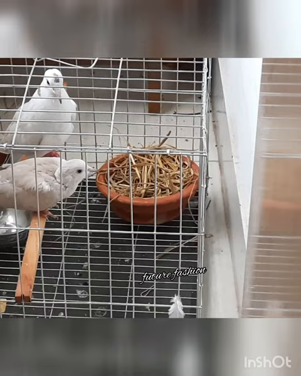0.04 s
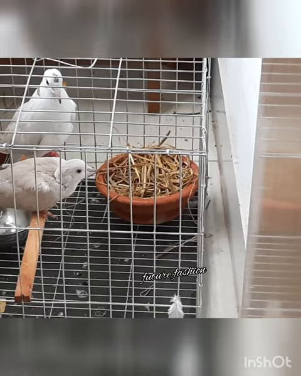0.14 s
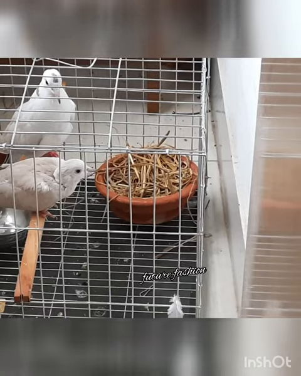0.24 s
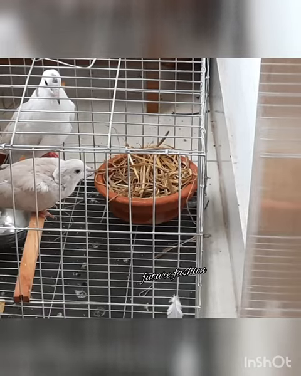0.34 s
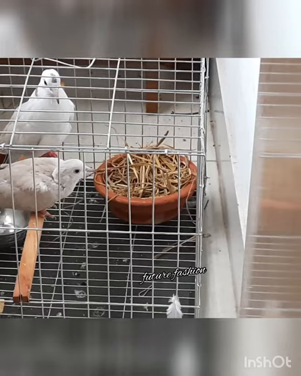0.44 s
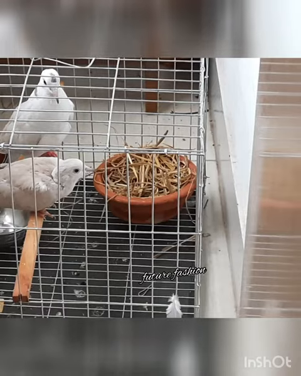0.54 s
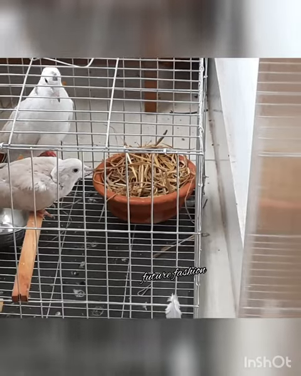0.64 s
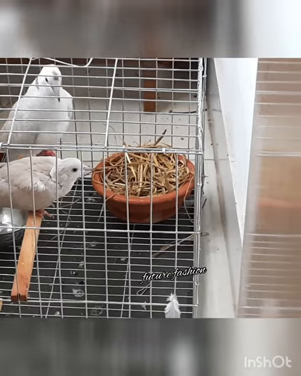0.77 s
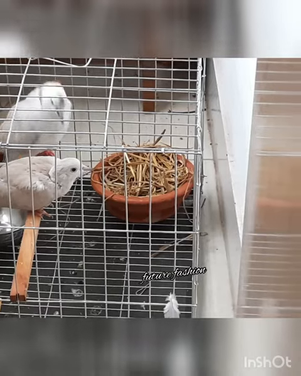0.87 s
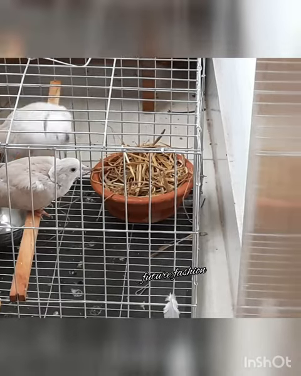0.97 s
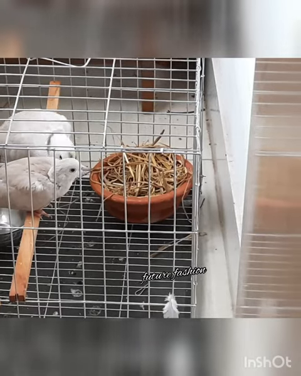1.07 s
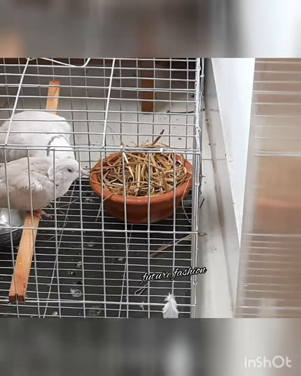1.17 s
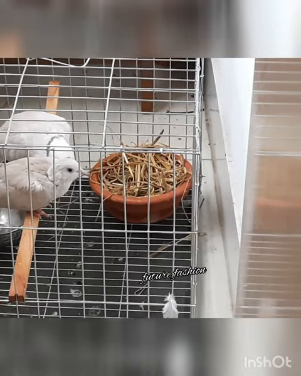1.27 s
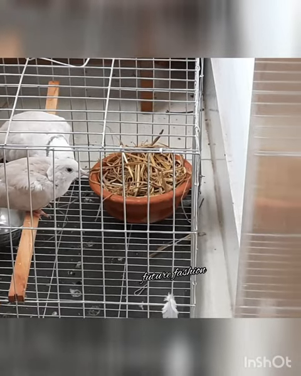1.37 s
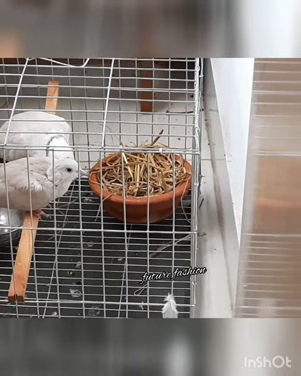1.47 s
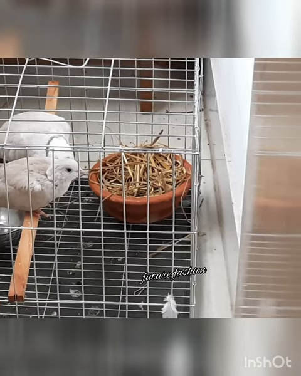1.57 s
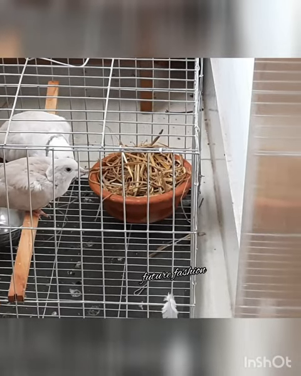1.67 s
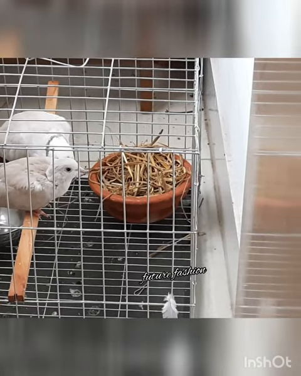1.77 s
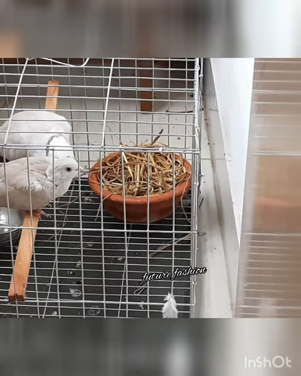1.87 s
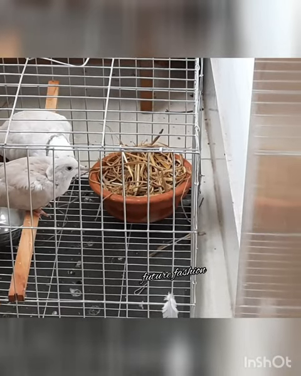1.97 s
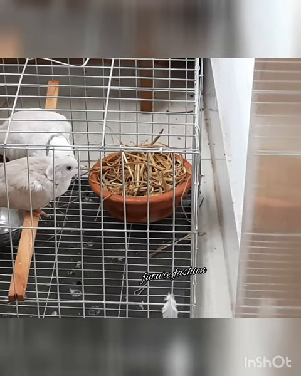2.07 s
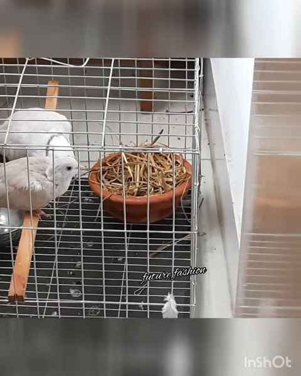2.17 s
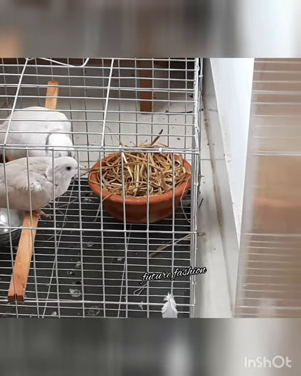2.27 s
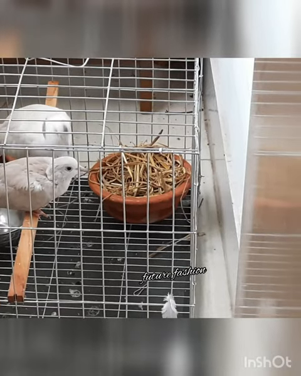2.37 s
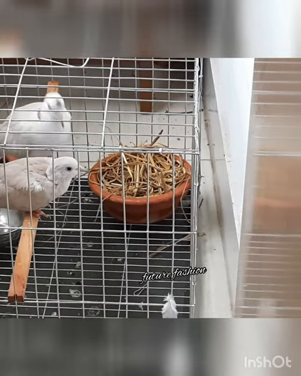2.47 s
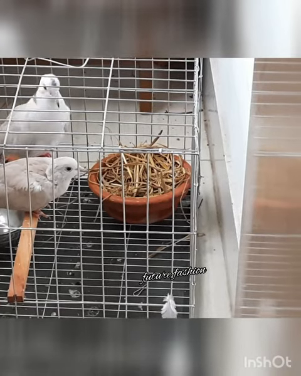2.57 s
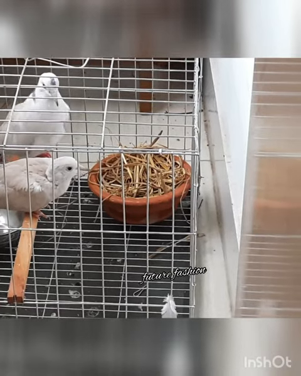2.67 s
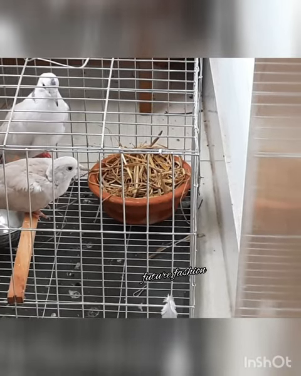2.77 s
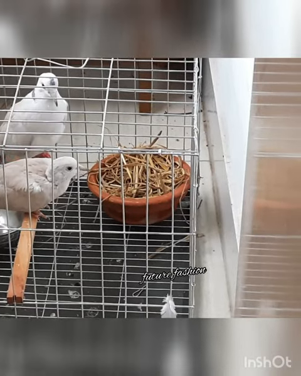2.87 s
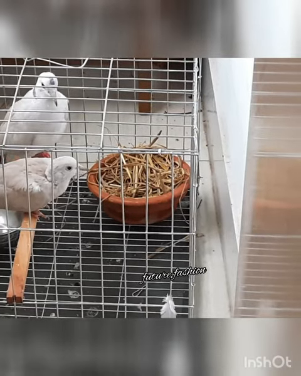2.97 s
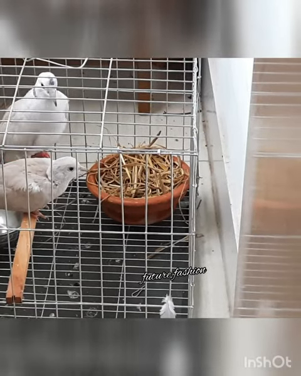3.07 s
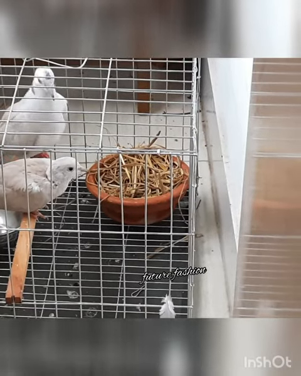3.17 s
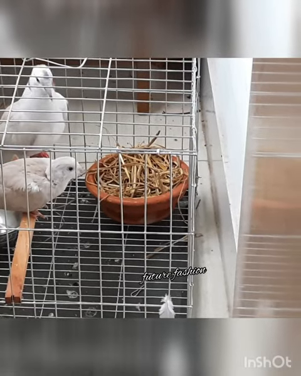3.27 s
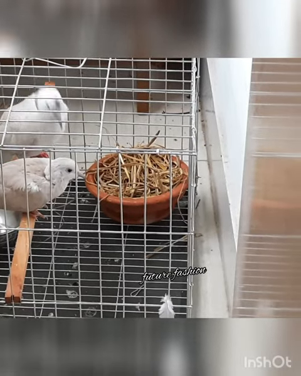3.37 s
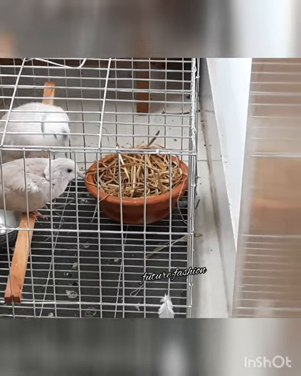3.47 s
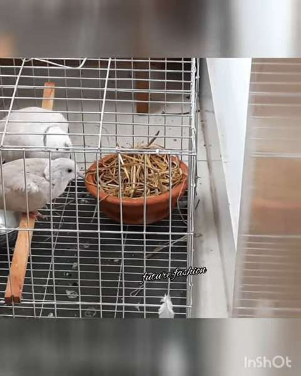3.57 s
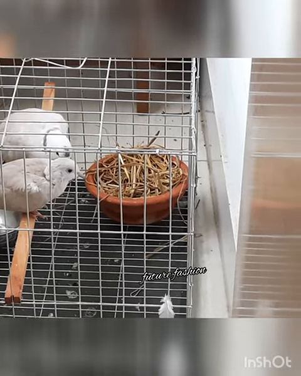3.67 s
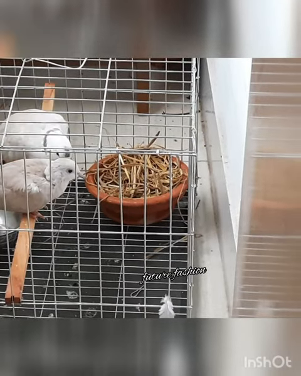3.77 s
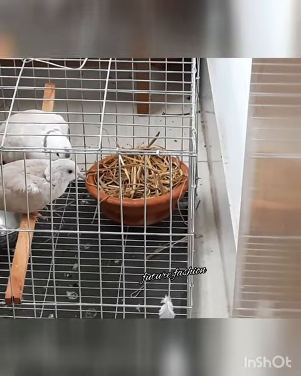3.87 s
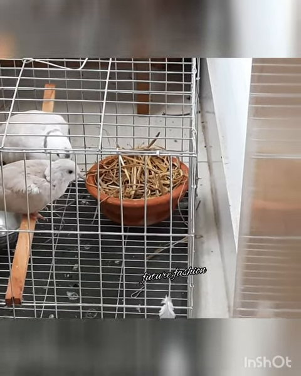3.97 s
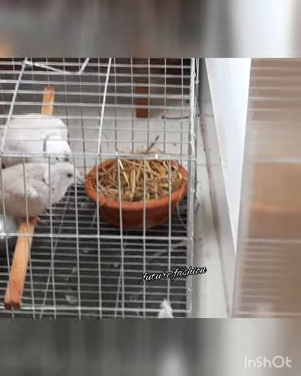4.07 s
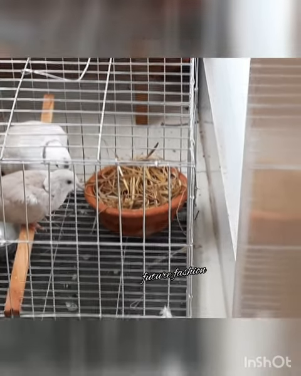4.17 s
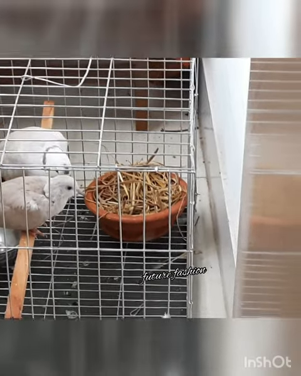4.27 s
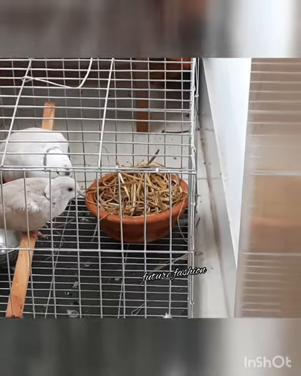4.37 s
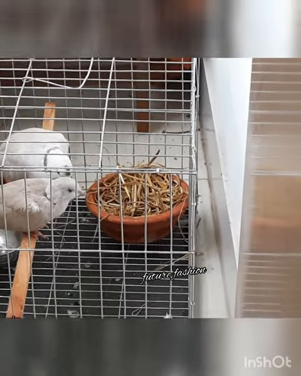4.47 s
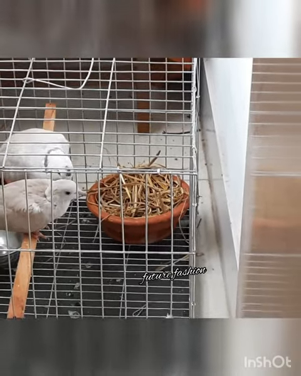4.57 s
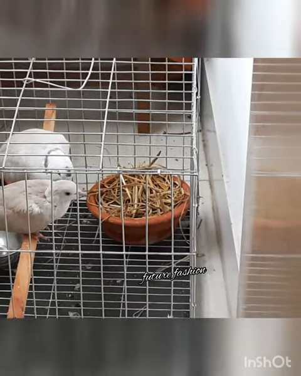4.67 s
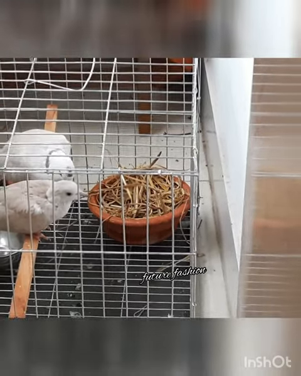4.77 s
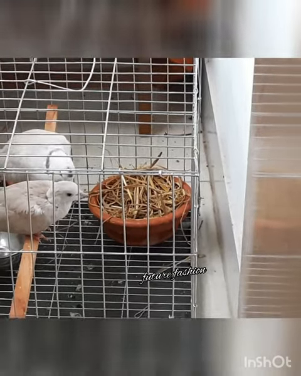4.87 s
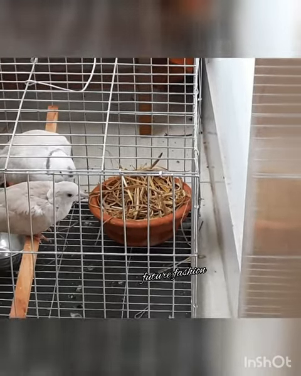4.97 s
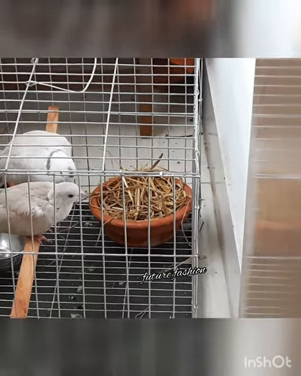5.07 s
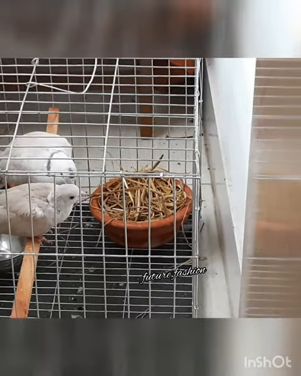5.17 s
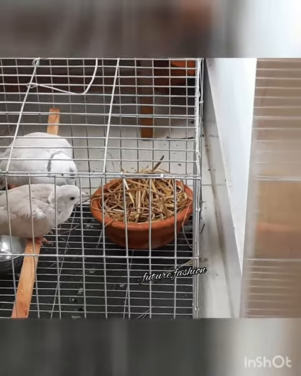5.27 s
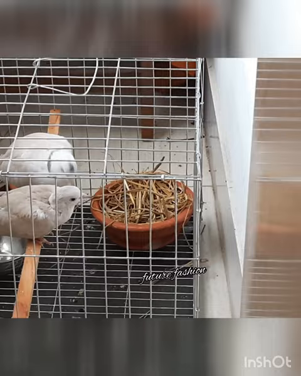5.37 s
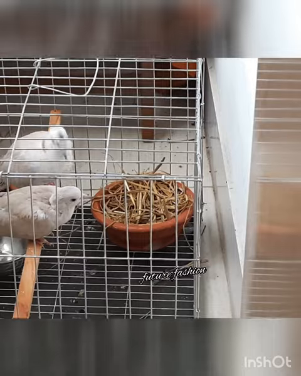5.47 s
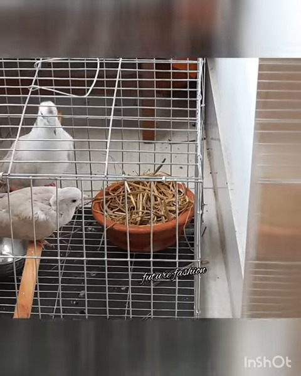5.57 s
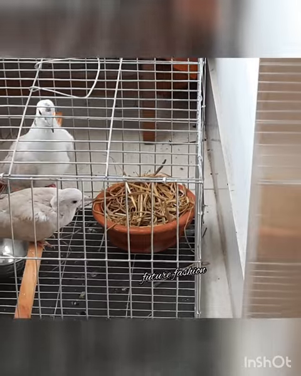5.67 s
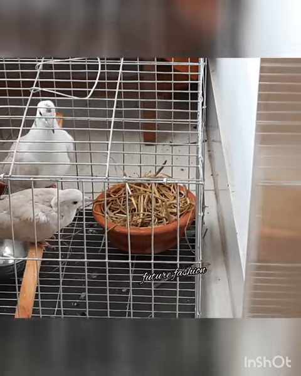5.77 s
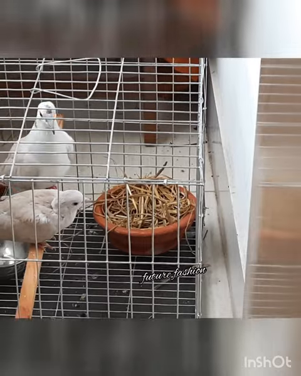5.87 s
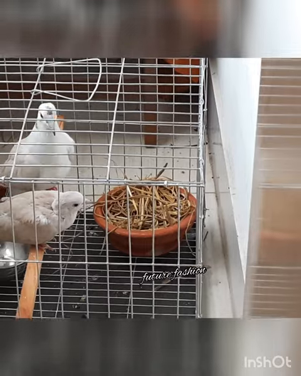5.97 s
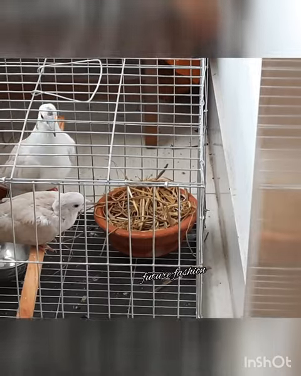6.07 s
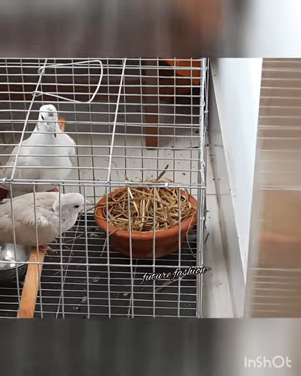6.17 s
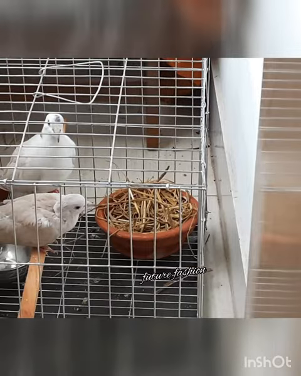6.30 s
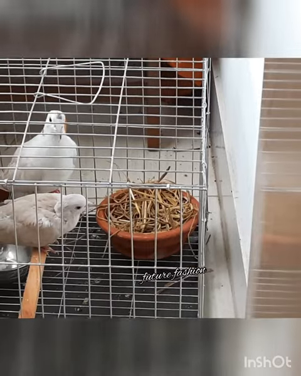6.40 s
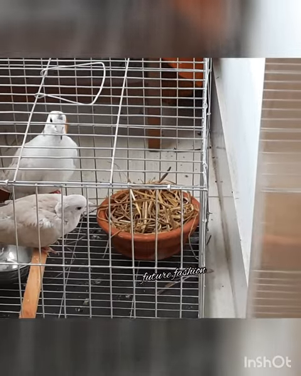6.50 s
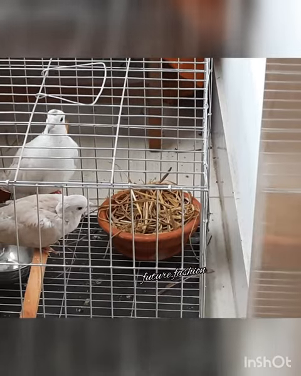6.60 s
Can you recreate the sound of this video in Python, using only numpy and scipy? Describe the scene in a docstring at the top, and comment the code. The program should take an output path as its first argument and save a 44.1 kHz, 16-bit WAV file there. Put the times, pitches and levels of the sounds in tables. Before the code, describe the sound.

A dove coos close to a phone on a hard-walled balcony. The tail of one coo falls away first, then two complete coos follow, each a brief hoot, a quick rolling purr and a long descending note. The walls make the pure, low tone boom and ring. Behind it are quiet traffic wash, soft rustles, thin distant whistles, sparrow chirps and a faint high squeak.

```python
"""A dove coos in a wire cage on a walled balcony, close to a phone: a short hoot, a rolled purr, a long falling note.
It opens on a long note, then come two whole coos, each an almost pure gliding tone with faint overtones.
The hard walls boom at a few pitches, near walls echo and a far wall returns a faint echo.
Behind it lie shaped-noise street wash and rustles, and blurred tones: horns, whistles, sparrows, a repeating squeak."""
import sys
import numpy as np
from scipy import signal
from scipy.fft import rfft, irfft
from scipy.io import wavfile
from scipy.ndimage import uniform_filter1d

SR = 44100
rng = np.random.default_rng(int(sys.argv[2]) if len(sys.argv) > 2 else 0)


def dump_mix(stems):
    """Bounce the given channels to the path in sys.argv[1] as a 16-bit WAV at rate SR."""
    frames = np.atleast_2d(stems).T  # one column per channel
    limited = np.clip(frames, -1, 1)  # hard clip at full scale
    pcm = np.round(limited * 32767).astype(np.int16)
    wavfile.write(sys.argv[1], SR, pcm)


N = 292804  # length of the scene [samples]


def gain_of(db):
    """Decibels to an amplitude factor."""
    return 10 ** (np.asarray(db) / 20)


def evened(x):
    """Scales to rms 1."""
    return x / np.sqrt(np.mean(x ** 2) + 1e-20)


def read(points, hz):
    """Reads a table along log frequency."""
    f, value = np.transpose(points)
    return np.interp(np.log(hz + 1), np.log(f + 1), value)


def add(mix, s, sound):
    """Mixes a sound in at s seconds, cut off at the end of the mix."""
    part = mix[..., round(s * SR):][..., :sound.shape[-1]]
    part += sound[..., :part.shape[-1]]


def swelled(length, rise_s, fall_s):
    """An envelope with rounded ends; length in samples."""
    t = np.arange(length) / SR
    ramp = np.minimum(t / rise_s, t[::-1] / fall_s)
    return np.sin(np.pi / 2 * np.clip(ramp, 0, 1)) ** 2


def fuzz(length, width_hz):
    """Complex noise of rms 1 around zero frequency: two equal poles set its bandwidth."""
    r = np.exp(-np.pi * width_hz / SR)
    z = rng.standard_normal((2, length + SR // 10))  # the extra tenth of a second lets the filter settle
    z = signal.lfilter([1], [1, -2 * r, r * r], z[0] + 1j * z[1])[-length:]
    return z / np.sqrt(np.mean(abs(z) ** 2))


# stereo likeness of the noises: (frequency [Hz], left-right correlation [-1 to 1])
PORT_LIKENESS = [(60, 0.63), (130, 0.89), (290, 0.79), (640, -0.11), (1410, -0.00096), (3100, 0.14),
                 (6820, -0.31), (15000, -0.14)]
# stereo balance of the noises: (frequency [Hz], left minus right [dB])
PORT_BALANCE = [(60, 1.5), (130, 3), (290, -0.5), (640, 1), (1410, -6), (3100, -5.5), (6820, -3),
                (15000, -5.5)]


def coloured(db_per_hz, length):
    """Stereo noise coloured by a spectrum curve; the two ports share most of the bass and little of the treble."""
    hz = np.fft.rfftfreq(1024, 1 / SR)
    a, b, c, d = rng.standard_normal((length // 256 + 5, 513, 4)).T
    left, other = a + 1j * b, c + 1j * d
    same = np.clip(read(PORT_LIKENESS, hz), -1, 1)[:, None]
    z = np.array([left, same * left + np.sqrt(1 - same ** 2) * other])
    half = read(PORT_BALANCE, hz)[:, None] / 2
    z *= gain_of(db_per_hz(hz[:, None]) + np.array([half, -half]))
    return signal.istft(z, nperseg=1024, noverlap=768)[1][:, :length]


def in_band(x, lo, hi):
    """Scales so that one band of the channel mean has rms 1."""
    band = signal.butter(4, [lo, hi], "bandpass", fs=SR, output="sos")
    return x / signal.sosfilt(band, x.mean(0)).std()


def far(first_hz, last_hz, length_s, blur_hz, steady, fade=0.62):
    """A far tone: a steady share plus a smear from many paths, differing per port; lasts 1.3 times length_s."""
    hz = np.linspace(first_hz, last_hz, round(1.3 * length_s * SR))
    u = np.linspace(0, 1, len(hz))
    paths = np.array([steady * np.exp(2j * np.pi * rng.random()) + fuzz(len(u), blur_hz) for _ in range(2)])
    tone = evened((paths * np.exp(2j * np.pi * np.cumsum(hz) / SR)).real)
    shape = swelled(len(u), 0.0073, .03) * np.exp(-fade * u ** 2)
    return tone * shape * gain_of([[-2.4], [1.6]])  # leans to the right


# overtones of the coo: (multiple of the pitch [-], level against the fundamental [dB])
COO_OVERTONES = [(2, -46.5), (3, -47)]


def voice(hz):
    """The closed beak and swollen throat pass an almost pure tone."""
    turn = 2 * np.pi * np.cumsum(hz) / SR
    overtones = sum(gain_of(db) * np.sin(k * turn) for k, db in COO_OVERTONES)
    return np.sqrt(2) * (np.sin(turn) + overtones)


def sing(gestures):
    """Plays gliding gestures, dry; each starts abruptly as the syrinx opens."""
    out = np.zeros(N)
    for rows in gestures:
        s, hz, db = np.transpose(rows)
        t = np.arange(s[0], s[-1], 1 / SR)
        effort = swelled(len(t), rise_s=0.0066, fall_s=0.0079) * gain_of(np.interp(t, s, db))
        add(out, s[0], effort * voice(np.interp(t, s, hz)))
    return out


# pitch and effort lines of the long notes, one list per note, dry: (time [s], pitch [Hz], effort [dB rms])
LONG_NOTES = [
    [(0.0, 607, -29), (.055, 612, -15.5), (.11, 599.8, -21), (.163, 594, -30.5), (.176, 527.7, -27),
     (.21, 527.5, -24), (.34, 514, -33.5), (.54, 493.3, -37), (.58, 469.4, -43.5), (.65, 475, -39),
     (.675, 460, -63)],
    [(2.088, 439, -29), (2.12, 616.3, -24), (2.27, 610.4, -22), (2.43, 602, -23.5), (2.5, 583.3, -26.5),
     (2.555, 586.7, -27), (2.604, 507.4, -32), (2.72, 487.7, -35.5), (2.8, 454.6, -45.5), (2.815, 460, -64)],
    [(4.576, 446.7, -26.5), (4.61, 631, -27.5), (4.67, 616, -43), (4.76, 605, -44), (4.86, 620, -30),
     (5.0, 610.8, -21.5), (5.13, 588.9, -29.5), (5.19, 584.5, -25), (5.25, 573.6, -35),
     (5.31, 510.5, -27.5), (5.38, 435, -57)],
]


def long_notes():
    """The long note that closes each coo, its pitch falling as the breath fades."""
    return sing(LONG_NOTES)


# wash of the street: (time [s], traffic at 900-1900 Hz [dB rms], hiss at 10.5-15 kHz [dB rms], engine rumble [dB rms])
STREET_LEVELS = [(0.0, -53, -76, -57), (0.07, -59, -80.5, -66.5), (0.37, -59, -83.5, -56),
                 (0.83, -61, -85, -61.5), (1.03, -58.5, -81, -54.5), (1.26, -63, -88, -68),
                 (1.4, -61.5, -84, -56), (1.96, -55.5, -80, -56), (3.0, -62, -84.5, -60.5),
                 (3.92, -60, -83.5, -62), (4.08, -55.5, -80, -52), (4.34, -57.5, -80.5, -62.5),
                 (4.36, -57.5, -81, -54), (4.86, -57.5, -80, -58.5), (5.47, -61.5, -86.5, -61.5),
                 (6.01, -63, -86, -63), (6.21, -62.5, -82, -49), (6.32, -62.5, -83.5, -71),
                 (6.51, -61, -80.5, -51.5), (6.64, -59, -80, -64)]
# colour of the traffic: (frequency [Hz], relative level [dB per Hz])
TRAFFIC_COLOUR = [(53, -45), (90, -13), (109, -1), (166, -13.5), (245, -4), (354, -5), (394, -11),
                  (590, -5.5), (899, -12.5), (4530, -33.5), (6000, -45.5), (7800, -77), (13200, -120)]
# colour of the fine hiss: (frequency [Hz], relative level [dB per Hz])
HISS_COLOUR = [(3000, -31.5), (4200, -17), (6000, -7.5), (7800, -7), (8600, -12), (9500, -28.5),
               (10800, -16), (12800, -13.5), (15500, -19.5)]
# colour of the engine rumble: (frequency [Hz], relative level [dB per Hz])
RUMBLE_COLOUR = [(21, -49), (35, -13.5), (59, 4.5), (75, -3), (92, -5.5), (100, -2.5), (130, -29.5),
                 (220, -120)]
# wavering drones in the wash: (frequency [Hz], width [Hz], level at mean traffic [dB rms])
STREET_DRONES = [(71, 24, -72), (117, 4.9, -60.5), (193, 12, -59), (236.6, 3.9, -61), (287.4, 27, -60),
                 (419.4, 30, -60), (844, 14, -61.5)]


def street(patchy_db=1.54):
    """Traffic wash in drifting patches, fine hiss above, rumble below, and wavering drones that follow the traffic."""
    s, *levels_db = np.transpose(STREET_LEVELS)
    t = np.arange(N) / SR
    traffic, hiss, rumble = (gain_of(np.interp(t, s, db)) for db in levels_db)
    # random level patches, smoothed over frequency and time
    patches = rng.standard_normal((N // 256 + 5, 513)).T
    patches = uniform_filter1d(uniform_filter1d(patches, 14, 0), 16, 1)
    patches = patchy_db * evened(patches)
    out = traffic * in_band(coloured(lambda hz: read(TRAFFIC_COLOUR, hz) + patches, N), 900, 1900)
    out += hiss * in_band(coloured(lambda hz: read(HISS_COLOUR, hz) + patches, N), 10500, 15000)
    # the rumble is mostly common to both ports
    grumble = rfft(rng.standard_normal((3, N))) * gain_of(read(RUMBLE_COLOUR, np.fft.rfftfreq(N, 1 / SR)))
    mid, *ports = irfft(grumble, N)
    out += rumble * evened(mid + .22 * np.array(ports)) * gain_of([[.8], [-.8]])
    follow = (traffic / traffic.mean()) ** 1.6
    for hz, width_hz, db in STREET_DRONES:
        drone = np.sqrt(2) * (fuzz(N, width_hz) * np.exp(2j * np.pi * hz * t)).real
        out += gain_of(db) * drone * follow
    return out


# booms of the walls, levels at resonance against the direct sound:
# (frequency [Hz], decay to -60 dB [s], polarity and strength [factor], left [dB], right [dB])
WALL_BOOMS = [(593.6, 0.32, 0.94, 16, 8.5), (482, 0.45, 0.88, 2, 8.5), (471, 0.54, -0.7, -5, -12),
              (547.6, 0.14, 0.77, 7, -8.5), (659.7, 0.16, -1, -12.5, 4)]
# echoes of the near walls: (delay [s], left [dB], right [dB])
NEAR_ECHOES = [(.004, -10.5, -3), (.009, -12, -17), (.016, -15, -7.5), (.024, -9, -8.5), (.035, -13, -11),
               (.051, -14.5, -22.5)]
# echo of the far wall, sides swapped: (delay [s], level [dB])
FAR_ECHO = (.42, -40.)


def balcony(x):
    """Direct sound, near echoes, the booms of the walls, a thin diffuse tail and one far echo."""
    t = np.arange(SR) / SR
    dying = gain_of(-60 * t / .4)  # the tail dies by 60 dB in .4 s
    response = gain_of(-19) * rng.standard_normal((2, SR)) * dying / np.linalg.norm(dying)
    for hz, t60, sign, *db in WALL_BOOMS:
        ring = gain_of(-60 * t / t60)
        response += sign * gain_of(db)[:, None] * 2 * ring / ring.sum() * np.sin(2 * np.pi * hz * t)
    response[:, 0] += 1  # direct sound
    for delay, *db in NEAR_ECHOES:
        response[:, round(delay * SR)] += gain_of(db)
    near = signal.fftconvolve(x[None], response, axes=1)[:, :N]
    out = near.copy()
    delay, db = FAR_ECHO
    add(out, delay, gain_of(db) * near[::-1])
    return out


# short rustles, levels before the fades: (time [s], length [s], level [dB rms], brightness tilt [dB per octave])
RUSTLE_EVENTS = [(0.041, 0.05, -57.5, -5), (0.204, 0.14, -73, 0), (0.584, 0.075, -53, -5),
                 (0.956, 0.14, -68, -4), (1.684, 0.2, -56.5, -6), (2.524, 0.064, -50.5, -7.5),
                 (2.712, 0.11, -70, -4), (3.202, 0.029, -60, -5), (6.375, 0.025, -65, -2),
                 (3.412, 0.19, -59.5, -6), (4.469, 0.22, -60, -8.5), (5.452, 0.11, -61, -6.5),
                 (5.705, 0.067, -52.5, -7.5), (6.372, 0.25, -59, -8.5)]
# shared colour of the rustles: (frequency [Hz], relative level [dB per Hz])
RUSTLE_COLOUR = [(1500, -28.5), (2500, -8), (4000, -6), (7500, -6.5), (8800, -16), (10000, -30),
                 (12500, -9.5), (15500, -23.5)]


def rustles():
    """Bursts of coloured noise, roughened by a random crackle and tapered at both ends."""
    out = np.zeros((2, N))
    for s, length, db, tilt_db in RUSTLE_EVENTS:
        n = round(length * SR)

        def colour(hz):
            return read(RUSTLE_COLOUR, hz) + tilt_db * np.log2(hz / 4000 + 0.009)

        noise = coloured(colour, n + 1024)[:, -n:]
        crackle = gain_of(3 * evened(uniform_filter1d(rng.standard_normal(n), 90)))  # grains of about 2 ms
        add(out, s, gain_of(db) * evened(noise * crackle) * signal.windows.tukey(n, .7))
    return out


def blurred_calls(rows):
    """Places far calls, given as rows of start, length, first and last pitch, level and blur."""
    out = np.zeros((2, N))
    for s, length, first_hz, last_hz, db, blur_hz in rows:
        add(out, s, gain_of(db) * far(first_hz, last_hz, length, blur_hz, steady=min(1.2, 30 / blur_hz)))
    return out


# thin far whistles, each sounding 1.3 times its length, levels before fades and stereo lean:
# (time [s], length [s], pitch [Hz], level [dB rms])
WHISTLE_EVENTS = [ (0.106, 0.12, 3810, -65), (.26, 0.084, 2860, -64), (0.924, .1, 4170, -72),
                  (0.953, 0.12, 3580, -73), (1.625, .07, 2200, -61.5), (1.7, 0.084, 4140, -62.5),
                  (1.711, 0.082, 3265, -64), (1.796, 0.072, 4150, -58), (1.807, 0.078, 3410, -58.5),
                  (1.877, .05, 2790, -62), (2.18, .07, 2803, -61.5), (2.458, 0.12, 3720, -60),
                  (2.58, 0.058, 3260, -65.5), (3.3, 0.13, 3600, -64.5), (3.438, 0.054, 3407, -53),
                  (3.462, 0.16, 3744, -64), (3.523, 0.054, 3394, -51.5), (3.581, .4, 3420, -66),
                  (3.676, 0.12, 3400, -59), (4.101, .08, 3400, -68.5), (4.105, 0.1, 2139, -62.5),
                  (4.21, .09, 3725, -62), (4.33, .09, 2790, -61), (4.505, 0.078, 2167, -60.5),
                  (5.416, 0.13, 3780, -65), (5.553, 0.12, 2720, -67), (5.975, .3, 3260, -64.5),
                  (5.981, 0.072, 3845, -70), (6.362, 0.29, 3330, -59), (6.436, 0.11, 3430, -69),
                  (6.485, 0.19, 3760, -66), (6.522, 0.12, 3440, -61.5)]


def whistles(blur_hz=44.6):
    """Far whistles, each holding one pitch, slightly blurred by the many paths."""
    return blurred_calls([(s, length, hz, hz, db, blur_hz) for s, length, hz, db in WHISTLE_EVENTS])


def twitters(count=16, low_hz=2820, high_hz=4540):
    """Fainter chirps at chance moments, gliding slightly up or down; the longer, the louder."""
    rows = []
    for when, pitch, slide, size in rng.random((count, 4)):
        hz = low_hz * (high_hz / low_hz) ** pitch
        last_hz = hz * (1 + 0.086 * (slide - .5))
        rows.append((when * N / SR, .07 * (.5 + size), hz, last_hz, -80 + 6 * size, 90))
    return blurred_calls(rows)


# a squeak on a beat of about three quarters of a second, some beats silent, levels before fades and stereo lean:
# (time [s], level [dB rms])
SQUEAK_EVENTS = [(1.0, -71), (1.73, -66.5), (3.96, -71.5), (4.669, -63.5), (5.43, -69.5), (6.19, -70.5)]


def squeaks(hz=6300, length_s=.24, octave_db=-10.):
    """A high blurred tone with a weaker, more smeared octave that fades sooner."""
    out = np.zeros((2, N))
    for s, db in SQUEAK_EVENTS:
        add(out, s, gain_of(db) * far(hz, hz, length_s, 45, steady=0.55, fade=2.0))
        add(out, s, gain_of(db + octave_db) * far(2 * hz, 2 * hz, length_s, 300, steady=.2, fade=2.5))
    return out


# short hoots that open each whole coo, dry: (time [s], length [s], top pitch [Hz], effort [dB rms])
HOOT_EVENTS = [(1.05, .15, 653.7, -33), (3.488, .183, 662, -34)]
# shape of a hoot, a low pop, a leap, a catch, a drop:
# (share of length [0-1], share of top pitch [0-1], level against the effort [dB])
HOOT_SHAPE = [(0, .72, 14.5), (.07, .79, -3), (.17, 1, 1.5), (0.301, 1, -3), (.6, .96, 3),
              (.76, .95, -12.5), (.88, .93, -3), (1, 0.9, -24)]


def hoots():
    """One gesture stretched to each hoot: a low pop leaps to the top pitch, catches and drops."""
    shape = np.array(HOOT_SHAPE)
    return sing([shape * [length, top_hz, 1] + [s, 0, db] for s, length, top_hz, db in HOOT_EVENTS])


# quick trills that begin each purr:
# (time [s], first gap [s], widening per pulse [s], final effort [dB rms], extra level of the timid start [dB])
TRILL_EVENTS = [(1.352, .0356, 0.000036, -33, -13.5), (3.832, .0341, 0.00035, -31, -5)]


def trill_pulses(count=10, pulse_s=0.031, swell_db=1.8, settle_pulses=1.1):
    """Pulse rows of the even trills: a timid, flat start, then growing effort and a climbing foot."""
    top_hz, flat_hz, foot_hz, climb_hz = 608, 85, 414.6, 4  # flat_hz: first pulse's drop; climb_hz: per pulse
    wobble_hz, wobble_db = 1.2 * 0 + 10, 1.2  # chance unevenness from pulse to pulse
    k, rows = np.arange(count), []
    timid = np.exp(-k / settle_pulses)
    for s, gap, widening, db, timid_db in TRILL_EVENTS:
        foot, push = rng.standard_normal((count, 2)).T * [[wobble_hz], [wobble_db]]
        starts = s + gap * k + widening * k ** 2 / 2
        first_hz = top_hz - flat_hz * timid
        last_hz = foot_hz + climb_hz * k + foot
        effort_db = db + push - swell_db * k[::-1] + timid_db * timid
        rows += zip(starts, pulse_s + 0 * k, first_hz, last_hz, effort_db)
    return rows


# slower rolls that end each purr, each sliding down, dry:
# (time [s], length [s], first pitch [Hz], last pitch [Hz], effort [dB rms])
ROLL_PULSES = [(1.719, 0.032, 596, 480, -29.5), (1.755, 0.052, 600, 512.4, -31.5),
               (1.799, 0.039, 603.5, 523, -30), (1.841, 0.055, 622, 513.7, -32),
               (1.9, .05, 623, 508.5, -27), (1.953, 0.069, 629.4, 460, -30), (2.034, 0.055, 618, 461, -28),
               (4.187, 0.033, 603, 466, -30), (4.224, 0.038, 607, 561, -30), (4.259, 0.057, 618, 557, -33),
               (4.313, .062, 617.4, 560, -32.5), (4.368, 0.062, 615.4, 522, -29),
               (4.442, .069, 639.3, 466, -30), (4.519, 0.045, 668.5, 474.5, -30)]


def purr(even_s=.05):
    """Trill, then rolls: one syrinx plays all pulses, so the tone runs on unbroken where pulses join."""
    hz, effort = np.full(N, 608.0), np.zeros(N)
    for s, length, first_hz, last_hz, db in trill_pulses() + ROLL_PULSES:
        u = np.linspace(0, 1, round(length * SR))
        slide = u ** (length / even_s)  # short pulses drop at once, long ones hold the pitch first
        hz[round(s * SR):][:len(u)] = first_hz + (last_hz - first_hz) * slide
        add(effort, s, swelled(len(u), rise_s=.007, fall_s=.008) * gain_of(db))
    return effort * voice(uniform_filter1d(hz, size=130))


# sparrow chirps, each sounding 1.3 times its length, levels before fades and stereo lean:
# (time [s], length [s], first pitch [Hz], last pitch [Hz], level [dB rms], blur [Hz])
CHIRP_EVENTS = [(1.38, .13, 5630, 5500, -73, 507), (2.118, 0.15, 5110, 3690, -62, 950),
                (2.16, 0.078, 4120, 3820, -61, 140), (3.421, 0.058, 6860, 7040, -64.5, 322),
                (4.184, 0.037, 5680, 5400, -65, 317.4), (4.198, .13, 4380, 3850, -63, 962),
                (4.481, .06, 4600, 4700, -63, 160), (4.53, 0.055, 4210, 4840, -61, 281),
                (4.565, 0.071, 4980, 5020, -58, 130), (5.854, 0.039, 4030, 4600, -63, 281.4),
                (5.874, .08, 4660, 4400, -63.5, 260)]


def chirps():
    """Sparrow chirps: short glides; the wider the blur, the noisier the chirp."""
    return blurred_calls(CHIRP_EVENTS)


# far horns, each sounding 1.3 times its length, levels before the mouth colour:
# (time [s], length [s], pitch [Hz], level [dB])
HORN_EVENTS = [(4.27, .09, 550, -71), (4.49, .1, 590, -60), (5.98, .3, 549, -77), (6.4, .14, 549, -74)]
# colour of the horn mouth: (frequency [Hz], gain [dB])
HORN_COLOUR = [(1500, -46), (2100, 4.5), (3400, 3), (4300, -4.5), (5500, -22), (8000, -41)]


def horns():
    """Far horns: only harmonics 3 to 9 sound, weighted by the mouth and nearly steady."""
    out = np.zeros((2, N))
    for s, length, pitch_hz, db in HORN_EVENTS:
        for k in range(3, 10):
            hz = k * pitch_hz
            add(out, s, gain_of(db + read(HORN_COLOUR, hz)) * far(hz, hz, length, 40, steady=0.95))
    return out


def scene():
    """Everything at the two microphone ports; only the dove is played through the balcony."""
    dove = long_notes() + hoots() + purr()
    neighbours = rustles() + whistles() + twitters() + squeaks() + chirps() + horns()
    return balcony(dove) + street() + neighbours


def record(dry):
    """The bass roll-off and the upper band limit of the phone."""
    thin = signal.sosfilt(signal.butter(4, 38, "highpass", fs=SR, output="sos"), dry)
    band_limit = signal.firwin(1023, 15680, window=("kaiser", 10), fs=SR)
    return signal.oaconvolve(thin, band_limit[None], "same")


dry = scene()
out = record(dry)
dump_mix(out)
```